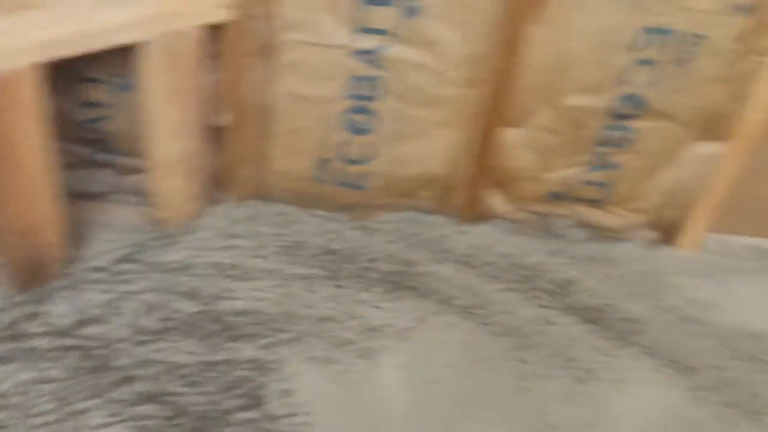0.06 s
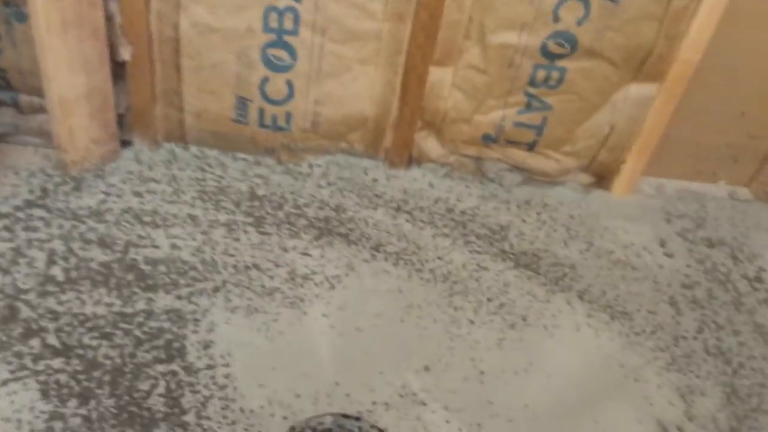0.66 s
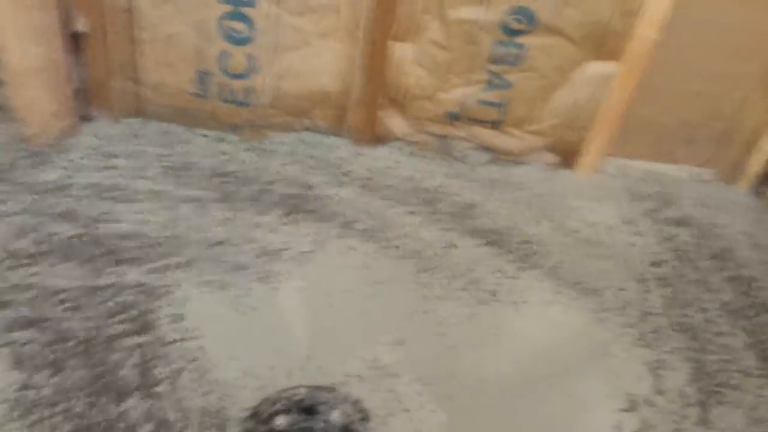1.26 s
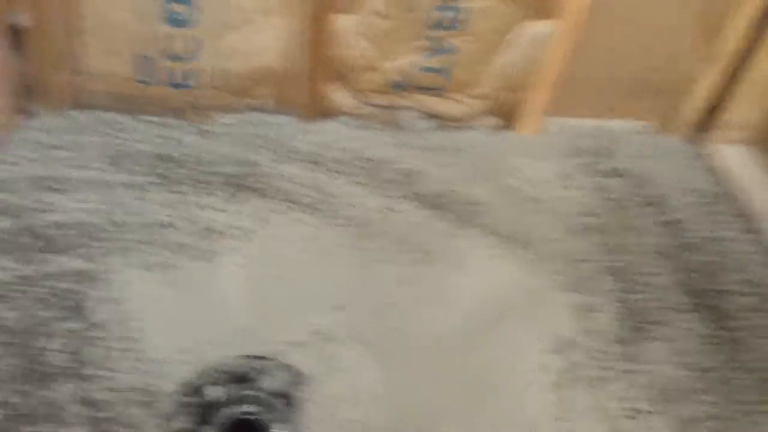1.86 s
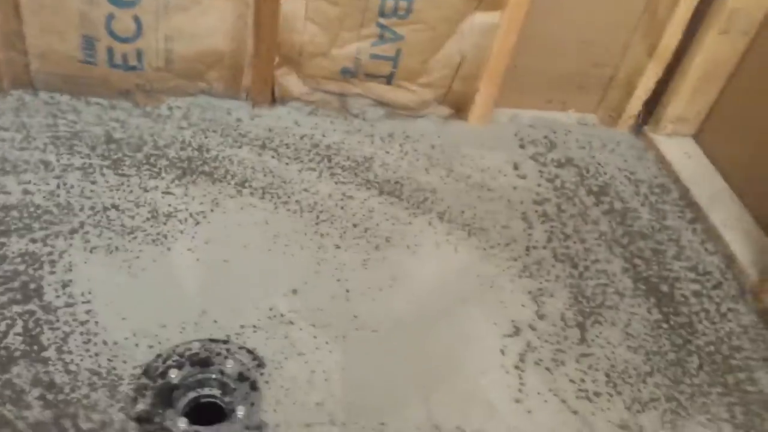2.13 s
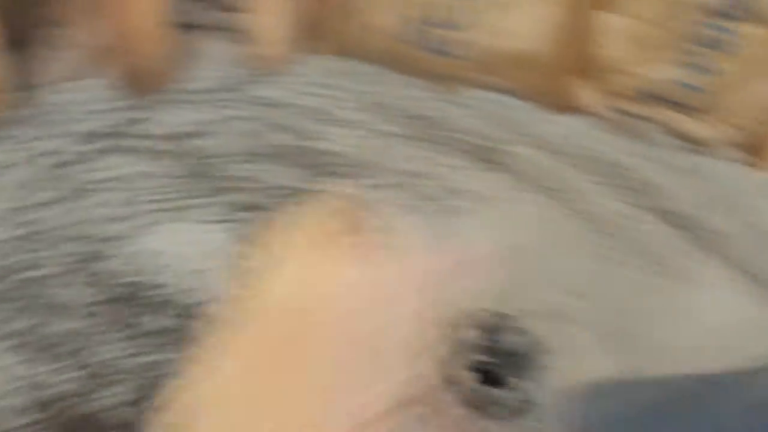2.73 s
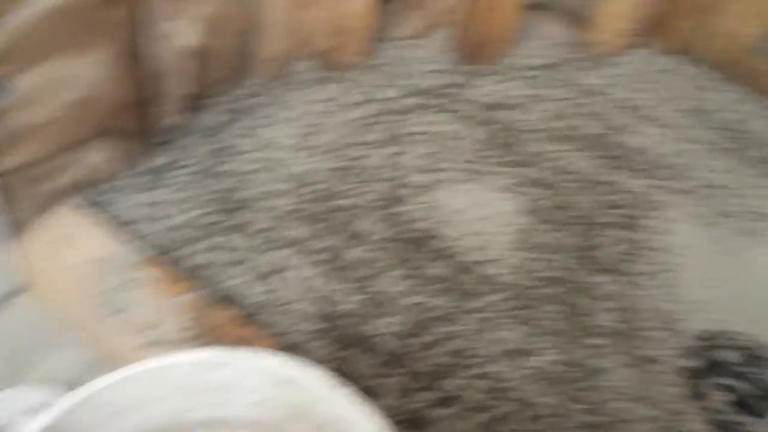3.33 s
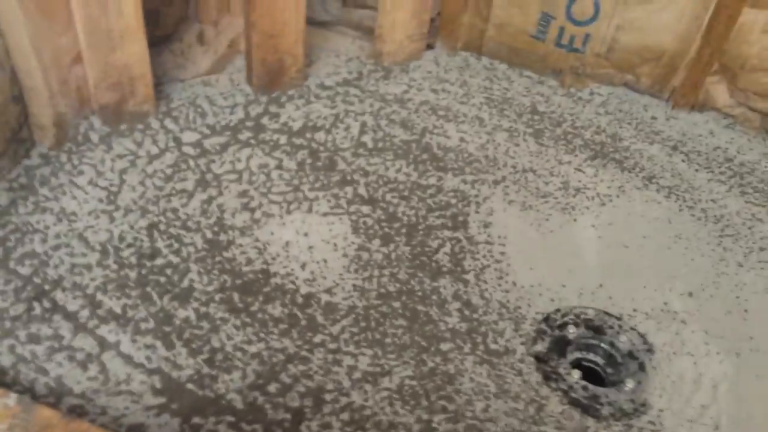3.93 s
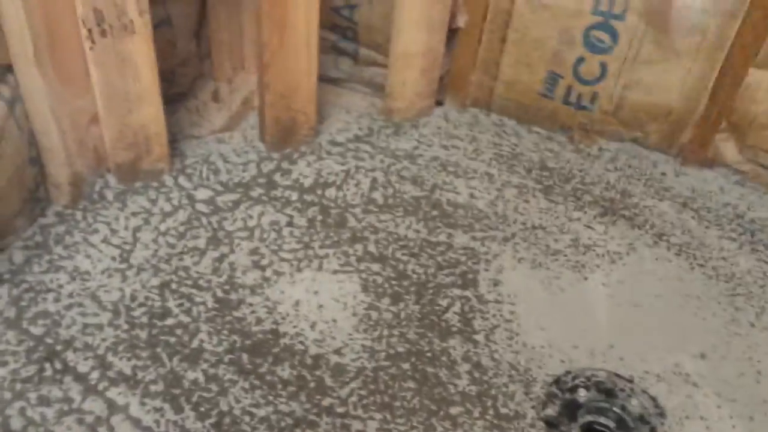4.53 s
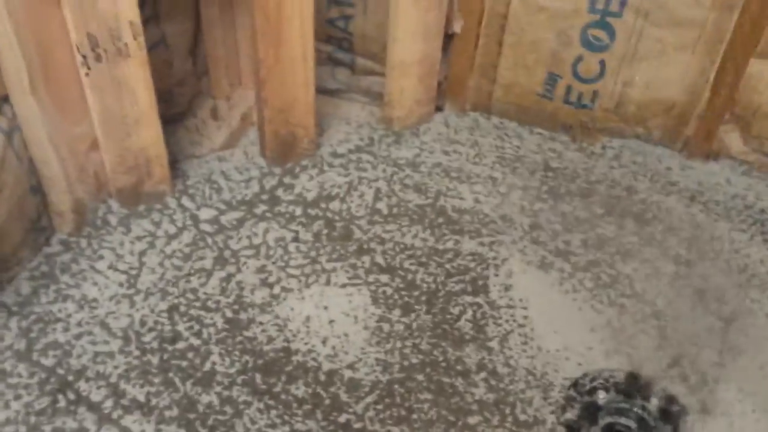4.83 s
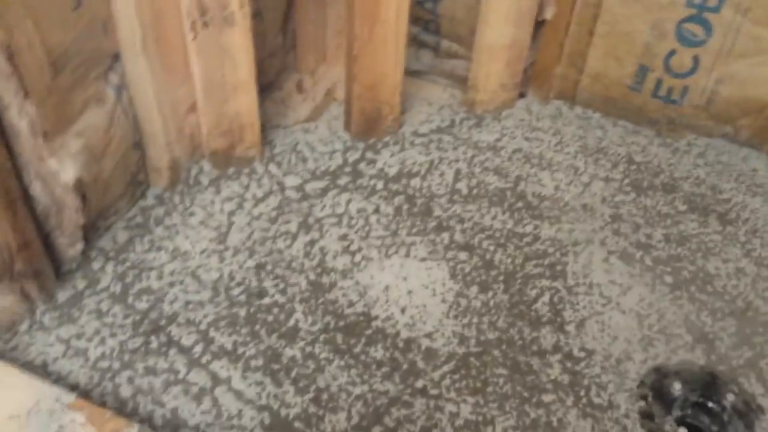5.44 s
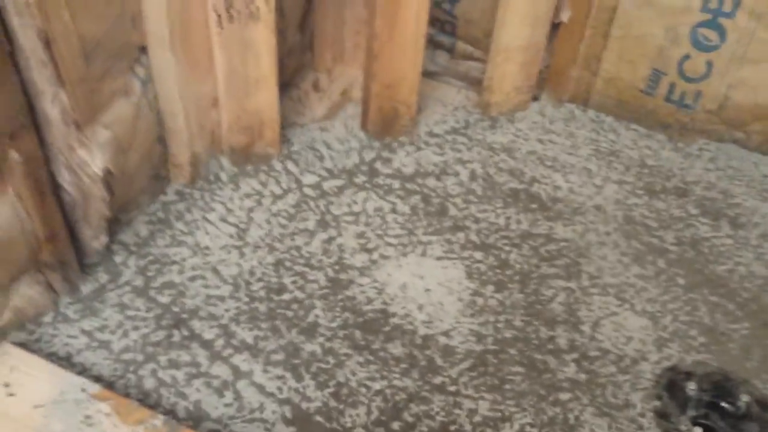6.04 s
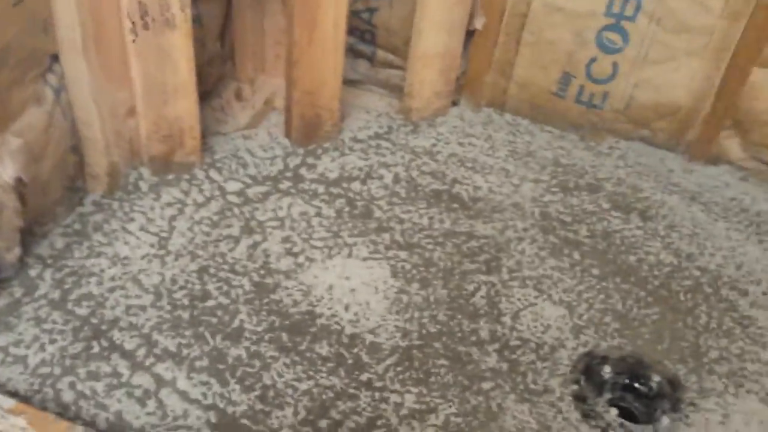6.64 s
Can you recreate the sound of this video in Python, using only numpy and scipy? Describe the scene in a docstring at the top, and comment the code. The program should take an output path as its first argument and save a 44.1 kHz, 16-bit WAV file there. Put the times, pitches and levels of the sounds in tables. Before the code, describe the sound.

A wet brush flicks water onto dry sand-cement mix in short splashes, with a brief bubbling dip in a bucket midway.

```python
"""A faint hiss, then splash after splash: a wet brush flicks water onto dry sand-cement mix.
Each flick lands as a cloud of drops: a soft thud, a slap and a bright spatter; a grainy hiss follows.
After five flicks the brush is dipped in a bucket, which bubbles and drips; five more flicks follow.
A closely spaced microphone pair hears it in a small timber-framed room, the bed of mix a little to
the left, the bucket a little to the right, stray drops close by in front."""
import sys
import numpy as np
from scipy import signal
from scipy.fft import rfft, irfft, next_fast_len
from scipy.io import wavfile

SR = 44100
rng = np.random.default_rng(int(sys.argv[2]) if len(sys.argv) > 2 else 0)


def generate_wav(signal):
    """Clip the signal to [-1, 1] and save it as 16-bit WAV at the path in sys.argv[1]."""
    frames = np.transpose(np.atleast_2d(signal))
    scaled = np.clip(frames, -1, 1) * 32767
    pcm = np.round(scaled).astype(np.int16)
    wavfile.write(sys.argv[1], SR, pcm)


N = 294588
TIME = np.arange(N) / SR

# Sheets of water landing, the longest flick in two. Each row: landing, flight, hold and fade (t60) in
# seconds, relative spatter and thud levels in dB, thud pitch in Hz, relative hiss level in dB.
FLICKS = [(0.496, .15, 0.0039, .16, -26, -35, 209, -46), (0.938, 0.1, 0.025, 0.15, -27, -32.5, 223.6, -50),
          (1.344, 0.067, 0.013, 0.15, -31, -37, 292, -62),
          (1.743, 0.05, 0.0047, 0.13, -32.5, -43, 262, -69),
          (2.346, .055, 0.01, 0.12, -47.5, -55, 280, -72), (4.773, 0.13, 0.026, 0.43, -31, -37, 287, -48),
          (4.834, 0.16, 0.029, 0.48, -36, -45, 320, -55),
          (5.256, 0.12, 0.022, 0.22, -36.5, -46.5, 315, -46.5),
          (5.687, 0.12, 0.022, 0.24, -34.5, -42, 368, -51),
          (6.046, 0.14, 0.0082, 0.19, -32, -40, 393, -56.5),
          (6.416, 0.093, 0.015, 0.18, -39, -46.5, 354, -60)]


def flicks(heavy_fade_share=0.76, clump_db=2.0, typical_flight_s=0.098, typical_fade_s=0.19):
    """Sheets of drops land: big ones thump the soft bed and end first, small ones crackle in clumps."""
    # The bed's thud. Each row: multiple of the thud pitch, gain in dB.
    thud = [(.06, -47), (.17, -50), (.45, -12.5), (.7, -5.5), (1, 6.5), (1.35, -4), (1.65, -8.5), (2.1, 0),
            (3, -23.5), (8, -36.5)]
    # Spectra of the wooden floor and of water hitting sand. Each row: frequency in Hz, gain in dB.
    boom = [(40, -46.5), (85, -12.5), (122, 3.5), (150, -7.5), (220, -27), (600, -65)]
    slap = [(200, -36), (550, -0.5), (900, 8), (1400, 8.5), (2200, -4), (4000, -48), (9000, -51)]
    spatter = [(900, -32), (2000, -7.5), (3000, 0.5), (4000, -2.5), (5300, 2.5), (6500, -0.5), (8000, -6.5),
               (11000, -29.5), (16000, -2)]
    fizz = [(3000, -17.5), (6000, 2.5), (8000, 0), (11000, 1), (13500, -2), (16000, -10)]
    out, t = np.zeros((2, N)), np.arange(SR * 3 // 4) / SR
    heaviest_db = max(row[5] for row in FLICKS)
    for s, flight, hold, fade, spatter_db, thud_db, thud_hz, _ in FLICKS:
        rise = .011 * (flight / typical_flight_s) ** 1.44  # drops spread out in flight
        slap_db = -38 + 0.76 * strength(spatter_db, thud_db)
        fizz_db = spatter_db - 4 + 2.1 * np.log2(fade / typical_fade_s)  # a spread sheet breaks finer
        boom_db = thud_db - 10 + 1.65 * (thud_db - heaviest_db)  # only heavy sheets shake the floor much
        onset, fading_s = np.minimum(t / rise, 1) ** 1.15, np.maximum(t - rise - hold, 0)
        big_flow = onset * amp(-60 * fading_s / (heavy_fade_share * fade))
        small_flow = onset * amp(-60 * fading_s / fade)
        knots = t[::256]
        clumps = amp(clump_db * np.interp(t, knots, rng.standard_normal(len(knots))))
        big = big_flow * impacts(len(t), rate=2500, spread_db=7.5)
        small = small_flow * clumps * impacts(len(t), rate=3000, spread_db=7.0)
        big = scattered(big, count=2, wet_db=-3.5, lag=3.6, early_db=8.5)
        small = scattered(small, count=8, wet_db=4, lag=10, early_db=4.5, early_t60=0.037)
        splash = amp(thud_db) * unit(coloured(big, thud, thud_hz))
        splash += amp(boom_db) * unit(coloured(big, boom))
        for colour, db in (slap, slap_db), (spatter, spatter_db), (fizz, fizz_db):
            splash += amp(db) * unit(coloured(small, colour))
        add(out, s, amp(2.0) * splash * np.sqrt(np.mean(small_flow ** 2)))
    return out


def strength(spatter_db, thud_db, typical_db=-33):
    """How many dB harder than typical a flick lands."""
    return (spatter_db + thud_db) / 2 - typical_db


def bucket(hollow_hz=390, width_hz=20, pan_db=-3.0):
    """Right of centre the brush churns up bubbles and bursting froth; the air in the bucket hums along."""
    # The biggest bubbles. Each row: start in seconds, relative level in dB, pitch in Hz.
    bubbles = [(3.792, -29, 1418), (3.831, -17, 4430), (3.877, -19.5, 3050), (3.953, -30.5, 1280),
               (3.987, -31.5, 1450), (4.031, -21, 3370), (4.065, -25.5, 978), (4.088, -20.5, 1000),
               (4.124, -30.5, 956), (4.199, -29.5, 1146), (4.202, -19.5, 2760), (4.234, -24.5, 1002),
               (4.247, -27, 1255), (4.255, -31.5, 868), (4.299, -29, 1705), (4.3, -17.5, 3220)]
    # Spectrum of bursting froth. Each row: frequency in Hz, gain in dB.
    froth_colour = [(300, -22), (650, -29), (950, -15), (1500, 1), (2100, -9.5), (3200, 1.5), (4200, -7.5),
                    (5500, 4.5), (8000, -7), (16000, -12)]
    stir = stirring()
    gurgle = amp(-4.0) * swarm(count=260, low_hz=1132, high_hz=6500, cycles=54, spread_db=13.5)
    crackle = amp(4) * swarm(count=150, low_hz=4040, high_hz=14800, cycles=8.1, spread_db=18)
    out = sum(heard(stir * spot, room(wet_db=2, lag=-8, early_db=5.5, early_t60=0.038))
              for spot in gurgle + crackle)
    for s, db, hz in bubbles:
        plop = np.pad(ping(hz, cycles=40.3, glide=0.0093, attack_s=0.0014), (0, SR // 4))
        add(out, s, amp(db + 2.0) * heard(plop, room(wet_db=3.5, lag=-3.5, early_db=3.5)))
    froth = stir * impacts(N, rate=650, spread_db=-1.5)
    hollow = filtered(froth, lambda f: 1j * f * width_hz / (hollow_hz ** 2 - f * f + 1j * f * width_hz))
    hiss = coloured(scattered(froth, count=4, wet_db=8, lag=-12, early_db=7), froth_colour)
    return (out + amp(13.5) * hollow + amp(6.5) * hiss) * amp([[pan_db / 2], [-pan_db / 2]])


def stirring(drain_db=-5.5, drain_t60=1):
    """How hard the water moves: a swell for each stroke, then the run-off from the lifted brush."""
    # The brush enters, plunges, lifts out. Each row: peak in seconds, level in dB, half length in seconds.
    strokes = [(3.894, -46.5, 0.023), (4.098, -38, 0.07), (4.243, -43, 0.0095)]
    lift_s, lift_db, _ = strokes[-1]
    drain = (TIME > lift_s) * amp(lift_db + drain_db - 60 * np.abs(TIME - lift_s) / drain_t60)
    return drain + sum(amp(db) * swell(s, half_length) for s, db, half_length in strokes)


def swarm(count, low_hz, high_hz, cycles, spread_db, spots=4, start_s=3.78, end_s=6.1):
    """Random air pockets ring in the moving water, one track for each spot in the bucket."""
    out, span_s = np.zeros((spots, N)), end_s - start_s
    for k, (when, pitch, force) in enumerate(rng.random((count, 3))):
        hz = low_hz * (high_hz / low_hz) ** pitch
        ring = ping(hz, cycles, glide=0.07, attack_s=.5 / hz)
        add(out[k % spots], start_s + when * span_s, amp(spread_db * force ** 2) * ring)
    return unit(out) * np.sqrt(span_s * SR / N / spots)


def ping(hz, cycles, glide, attack_s):
    """An air pocket rings, 60 dB down after the given cycles, rising in pitch as it nears the surface."""
    t60 = cycles / hz
    t = np.arange(int(1.2 * SR * t60) + 2) / SR
    tone = np.sin(2 * np.pi * hz * t * (1 + glide * t / t60))
    return tone * amp(-60 * t / t60) * (1 - np.exp(-t / attack_s))


def drips(full_crack_hz=13500):
    """Stray drops snap with a tiny ring and a sharp crack, close in front of the microphones."""
    # The clearest single drops. Each row: start in seconds, relative level in dB, pitch in Hz.
    drops = [(0.062, -43, 5950), (0.146, -43, 4840), (1.956, -48, 6500), (3.235, -38.5, 10800),
             (3.797, -19, 9600), (3.835, -22.5, 9900), (3.869, -24, 5360), (3.955, -29.5, 4200),
             (3.989, -20.5, 5540), (4.0263, -20, 5200), (4.202, -16.5, 5400), (4.2277, -6.5, 5600),
             (4.2454, -22, 12100), (4.298, -21, 3950), (4.387, -28, 4930), (4.51, -27.5, 6700),
             (5.235, -34, 6600), (5.377, -17.5, 10000), (5.548, -22, 10600), (5.7229, -13, 8500)]
    # Tone of the snap. Each row: frequency in Hz, gain in dB.
    snap_colour = [(200, -5), (1000, -12), (3000, -6), (5000, 1.5), (16000, -2)]
    out = np.zeros((2, N))
    for s, db, hz in drops:
        snap = np.zeros(SR // 3)
        crack = np.diff(rng.standard_normal(65)) * np.exp(-np.arange(64) / 12) / 2
        add(snap, 0, ping(hz, cycles=8.4, glide=0.0089, attack_s=0.000097))
        add(snap, 0, (hz / full_crack_hz) ** 1.05 * crack)  # bigger, lower drops crack less
        response = room(wet_db=6.0, lag=0, early_db=1.0, early_t60=0.03)
        add(out, s, amp(db + 8.0) * heard(snap / np.abs(snap).max(), response))
    return coloured(out, snap_colour)


def swish_and_hiss(body_db=-1, ticks_db=1):
    """The brush swishes before each splash; a soft grainy hiss rises after it, holds briefly, then fades."""
    # Low and high spectra of the hiss. Each row: frequency in Hz, gain in dB.
    body = [(29, -26), (50, -11), (201, -14), (237, -4.5), (345, 0), (643, -8.5), (795, -6.5), (1100, -8),
            (1510, -8.5), (2090, -15.5), (2500, -12.5), (3250, -49), (5500, -120)]
    hiss = [(1290, -18), (2200, -7.5), (2690, 3), (4000, 3), (5570, 6), (12700, -4.5), (14800, -7.5),
            (16000, -23)]
    gain = hiss_gain(s=-0.15, flight=0.12, db=-48)  # already sounding as the scene opens
    swish = np.zeros(N)
    for s, flight, _, _, spatter_db, thud_db, _, hiss_db in FLICKS:
        gain = np.hypot(gain, hiss_gain(s, flight, hiss_db))
        swish += amp(-54 + 0.25 * strength(spatter_db, thud_db)) * swell(s - flight, 0.24 * flight)
    low = amp(body_db) * gain * grains(body, rate=3000, spread_db=3.0)
    ticks = gain * impacts(N, rate=90, spread_db=7)
    ticks = scattered(ticks, count=3, wet_db=3, lag=4, early_db=1, early_t60=0.033)
    fine = np.hypot(gain, swish) * grains(hiss, rate=4600, spread_db=0.0)
    return low + fine + amp(ticks_db) * coloured(ticks, hiss)


def hiss_gain(s, flight, db, rise_s=0.084, hold_flights=2.34, sag_db_per_s=22.5, release_db_per_s=37):
    """Gain of the hiss after a splash: it rises, sags slowly for a moment, then fades faster."""
    age = np.maximum(TIME - s, 0)
    loss_db = sag_db_per_s * age + release_db_per_s * np.maximum(age - hold_flights * flight, 0)
    return np.minimum(age / rise_s, 1) * amp(db - loss_db)


def hiss_swell():
    """A soft, steady background hiss swells before and during the bucket sounds."""
    # Course of the hiss. Each row: time in seconds, relative level in dB.
    levels = [(2.1, -78.5), (2.45, -69), (2.78, -72.5), (2.86, -67), (3.07, -71), (3.22, -56),
              (3.75, -55.5), (4.3, -58.5), (4.6, -52), (4.8, -63.5)]
    # Spectrum of the hiss. Each row: frequency in Hz, gain in dB.
    colour = [(35, -21), (60, -14), (124, -12.5), (172, -19.5), (287, -3), (427, -11.5), (515, -7),
              (607, -17.5), (698, -12), (1470, -21), (3340, -14.5), (4750, -8.5), (6140, -13),
              (13900, -22.5), (16000, -36)]
    level_db = np.interp(TIME, *np.transpose(levels), left=-120, right=-120)
    return amp(level_db + 2.5) * grains(colour, rate=7500, spread_db=3)


def room_tone(level_db=-66.5, lull_db=-7):
    """The faint hiss of the room, which sinks briefly between two flicks."""
    # Spectrum of the quiet room. Each row: frequency in Hz, gain in dB.
    colour = [(12, -57), (20, 1.5), (32, -18), (150, -2.5), (187, -13.5), (248, -7.5), (285, -21),
              (1260, -17.5), (7310, -17.5), (9140, -21), (16000, -23)]
    air = diffuse(rng.standard_normal((2, N))) + 3.4 * rng.standard_normal((2, N))
    return amp(level_db + lull_db * swell(s=2.08, half_length=0.087)) * unit(coloured(air, colour))


def room(wet_db, lag, early_db, early_t60=0.07):
    """Path to the microphones: direct sound (left leads by lag samples), near walls, short tail."""
    # Reverberation of the small room. Each row: frequency in Hz, t60 in seconds.
    decay = [(120, 0.52), (400, 0.43), (1200, 0.25), (5000, 0.33), (14000, 0.23)]
    size = SR // 3
    hz, frame_s, spectra = signal.stft(rng.standard_normal((2, size)), SR, nperseg=256)
    spectra *= amp(-60 * frame_s / along(decay, hz)[:, None])
    tail = signal.istft(spectra, SR, nperseg=256)[1][:, :size]
    t = np.arange(size) / SR
    walls = rng.standard_normal((2, size)) ** 3 * amp(-60 * t / early_t60)
    echo = diffuse((unit(tail) + amp(early_db) * unit(walls)) * (t > .001))
    response = amp(wet_db) * unit(echo) / np.sqrt(size)
    response[0, max(-round(lag), 0)] += 1
    response[1, max(round(lag), 0)] += 1
    return response / np.sqrt(np.sum(response ** 2) / 2)


def heard(x, response):
    """A mono source as it reaches both microphones."""
    return signal.oaconvolve(x[None], response, axes=1)[:, :len(x)]


def diffuse(pair, spacing_m=0.17):
    """Sound from all sides at the microphone pair: alike in the bass, unrelated in the treble."""
    turn = lambda hz: np.arccos(np.sinc(2 * hz * spacing_m / 343)) / 2
    mid, side = filtered(pair, lambda hz: np.array([np.cos(turn(hz)), np.sin(turn(hz))]))
    return np.array([mid + side, mid - side])


def impacts(size, rate, spread_db):
    """Random impulses of uneven strength, about rate a second, rms 1."""
    force = amp(spread_db * np.clip(rng.standard_normal(size), -2, 2)) * rng.choice([-1, 1], size)
    return unit(force * (rng.random(size) < rate / SR))


def scattered(hits, count, **acoustics):
    """Impulses fall on several spots, and every spot has its own echoes."""
    spot = rng.integers(0, count, len(hits))
    return sum(heard(hits * (spot == k), room(**acoustics)) for k in range(count))


def grains(colour, rate, spread_db):
    """Dense fine grains from all sides, rms 1."""
    pair = np.array([impacts(N, rate, spread_db) for _ in range(2)])
    return unit(coloured(diffuse(pair), colour))


def swell(s, half_length):
    """A bell-shaped gain that peaks at time s."""
    return np.exp(-((TIME - s) / half_length) ** 2 / 2)


def amp(db):
    """Decibels to gain."""
    return 10 ** (np.asarray(db) / 20)


def unit(x):
    """Scaled to rms 1."""
    return x / np.sqrt(np.mean(x ** 2) + 1e-20)


def along(points, hz):
    """(Hz, value) points read on a log axis."""
    f, values = np.transpose(points)
    return np.interp(np.log(hz + 1e-6), np.log(f), values)


def add(track, s, sound):
    """Mix a sound into a track at time s."""
    part = track[..., max(round(s * SR), 0):][..., :sound.shape[-1]]
    part += sound[..., :part.shape[-1]]


def filtered(x, response):
    """Filter x by a function of frequency."""
    size = next_fast_len(x.shape[-1] + SR // 8, True)
    return irfft(rfft(x, size) * response(np.fft.rfftfreq(size, 1 / SR)), size)[..., :x.shape[-1]]


def coloured(x, points, scale=1, size=4096):
    """Minimum-phase filter through (frequency, dB) points, their frequencies multiplied by scale."""
    cepstrum = irfft(np.log(amp(along(points, np.fft.rfftfreq(size, 1 / SR) / scale))))
    cepstrum[1:size // 2] *= 2
    cepstrum[size // 2 + 1:] = 0
    return signal.oaconvolve(x, irfft(np.exp(rfft(cepstrum)))[None], axes=1)[:, :x.shape[-1]]


def scene():
    """Splashes, bucket and drips over the faint hiss of the room."""
    background = room_tone()
    return flicks() + swish_and_hiss() + hiss_swell() + bucket() + drips() + background


def record(dry, top_hz=15550):
    """The left microphone favours the presence range, the right the top; a steep low-pass ends the band."""
    # Balance of the pair. Each row: frequency in Hz, left minus right in dB.
    balance = [(60, 1.5), (250, 3.5), (900, 0), (2000, 0.5), (3300, 0.5), (5000, 7.5), (7000, 2.5),
               (9500, -8.5), (13000, -8)]

    def microphones(hz):
        gains = amp(np.outer([.5, -.5], along(balance, hz)))
        band = 1 / np.sqrt(1 + (hz / top_hz) ** 260)
        return band * gains / np.sqrt(np.mean(gains ** 2, axis=0))
    return filtered(dry, microphones)


dry = scene()
out = record(dry)
generate_wav(out)
```